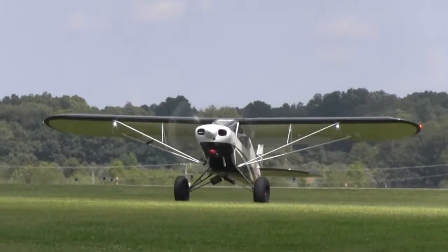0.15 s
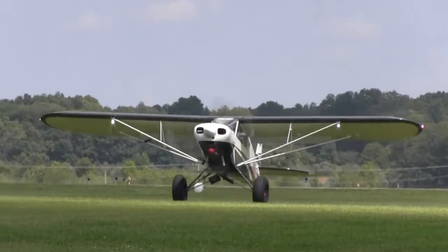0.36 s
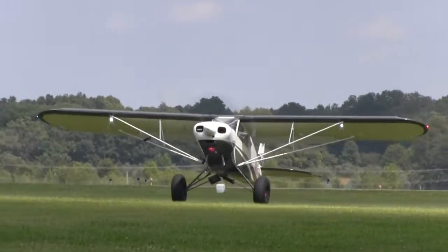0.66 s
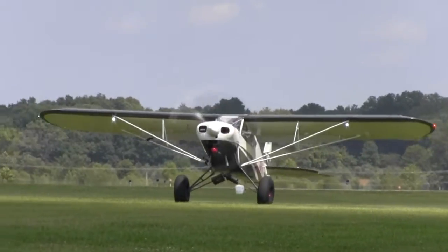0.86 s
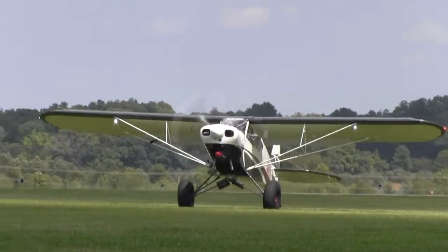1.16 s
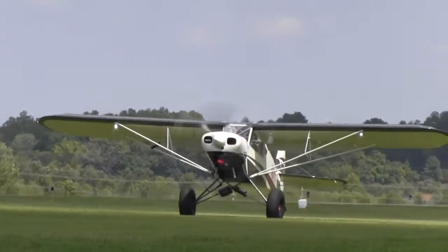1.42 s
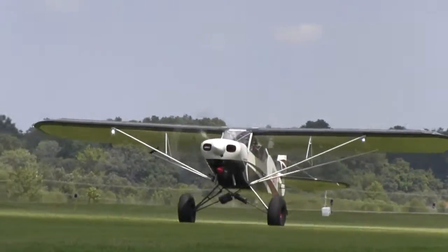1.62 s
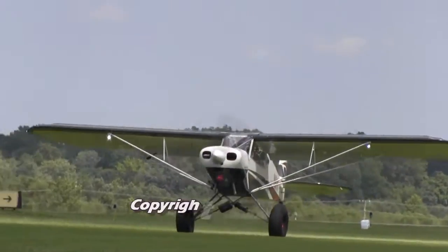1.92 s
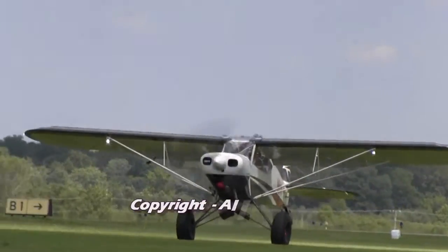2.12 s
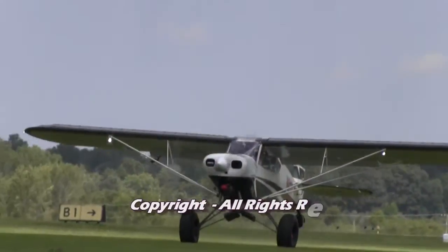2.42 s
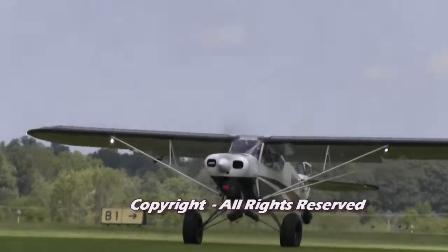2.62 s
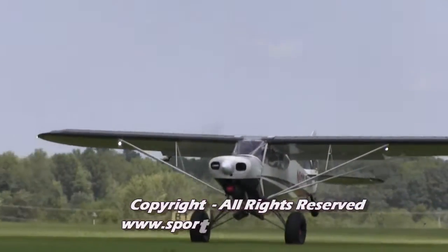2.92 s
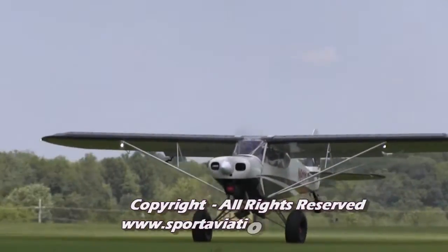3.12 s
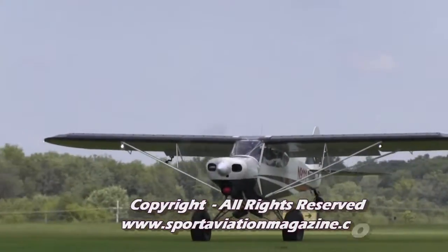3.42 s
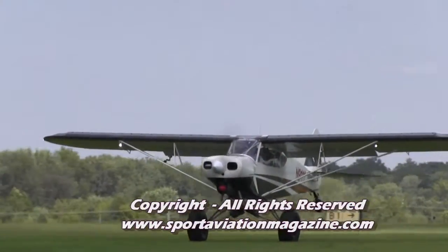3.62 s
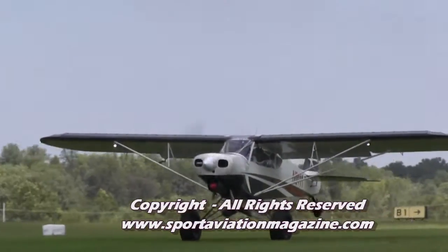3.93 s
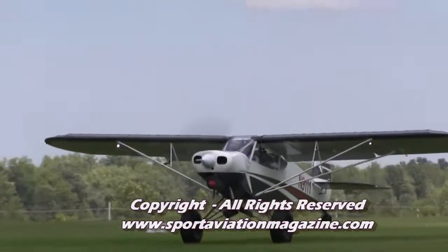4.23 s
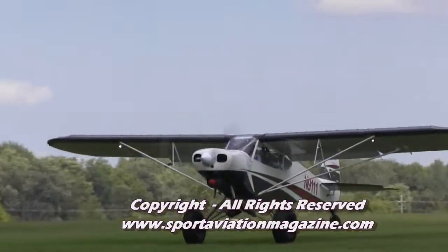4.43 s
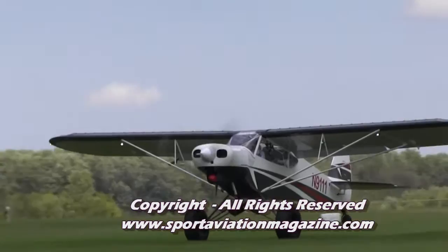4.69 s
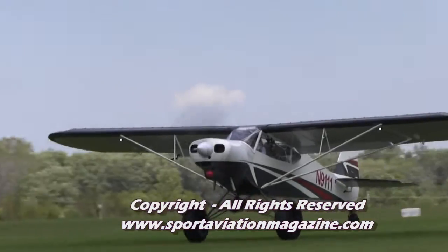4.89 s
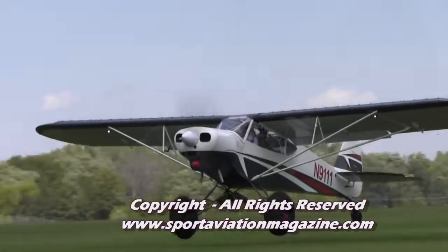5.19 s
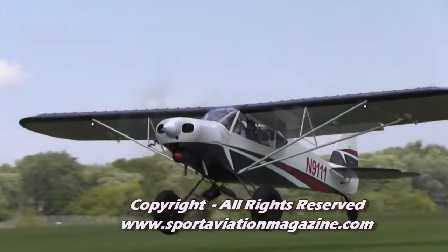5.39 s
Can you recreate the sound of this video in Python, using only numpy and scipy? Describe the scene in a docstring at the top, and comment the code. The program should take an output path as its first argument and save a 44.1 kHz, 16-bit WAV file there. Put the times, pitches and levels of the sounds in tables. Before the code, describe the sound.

A light aircraft on its takeoff run comes toward a stereo microphone at a grassy airfield. A steady, lumpy piston drone and soft air rush open the scene, with thin rasping insect chirps during the first second and a half. The fluttering roar then builds, brightening with propeller hiss and a subtle hollow, sweeping coloration, reaching its strongest around five seconds and remaining loud to the end.

```python
"""Over a grass field, a light aircraft runs at full power toward the microphone.
The exhaust note is a harmonic series of unequal cylinder blasts filtered by a resonant pipe.
The roar joins repeating barks, pulsed jet noise and the propeller's hiss, combed by airframe echoes.
Low propeller wash is shaped noise; an insect in the grass chirps by gating one narrow resonance."""
import sys
import numpy as np
from scipy import signal
from scipy.fft import rfft, irfft
from scipy.io import wavfile
from scipy.ndimage import uniform_filter1d

SR = 44100
rng = np.random.default_rng(int(sys.argv[2]) if len(sys.argv) > 2 else 0)


def wrap_up_sound(samples):
    """Save the sound to the file named by the first command line argument, as 16-bit audio."""
    columns = np.atleast_2d(samples).T
    # keep every value between -1 and 1, then stretch to whole-number steps
    tamed = np.clip(columns, -1, 1)
    steps = np.round(tamed * 32767).astype(np.int16)
    wavfile.write(sys.argv[1], SR, steps)


N = 244755
FRAME = 1024  # samples in a short-time spectrum
TIME, BIN_HZ = np.arange(N) / SR, np.fft.rfftfreq(FRAME, 1 / SR)


def amp(db):
    """Decibel law: level to amplitude gain."""
    return 10 ** (np.asarray(db) / 20)


def unit(x):
    """Normalisation to an rms of 1."""
    return x / np.sqrt(np.mean(abs(x) ** 2) + 1e-20)


def curve(rows, t, axis=1):
    """Linear interpolation of one column of a time table."""
    rows = np.asarray(rows)
    return np.interp(t, rows[:, 0], rows[:, axis])


def spectrum(points, hz):
    """Interpolation of (frequency, value) points on a log-frequency axis."""
    f, value = np.transpose(points)
    return np.interp(np.log(hz + 1), np.log(f + 1), value)


def fades(x, knots):
    """Linear crossfade: triangular weights, one row a knot, that sum to 1."""
    return np.array([np.interp(x, knots, row) for row in np.eye(len(knots))])


def wander(corner_hz):
    """Low-passed Gaussian noise of rms 1."""
    lowpass = 1 + (np.fft.rfftfreq(N, 1 / SR) / corner_hz) ** 4
    return unit(irfft(rfft(rng.standard_normal(N)) / lowpass, N))


def frames(x):
    """Short-time Fourier analysis, bins by frames."""
    return signal.stft(x, nperseg=FRAME, noverlap=FRAME - FRAME // 4)[2]


def unframe(z):
    """Overlap-add resynthesis from short-time spectra."""
    return signal.istft(z, nperseg=FRAME, noverlap=FRAME - FRAME // 4)[1][..., :N]


# engine cycles as heard, two shaft turns each: starting rate, its rise, place in the first cycle (0-1)
CYCLE_HZ, RISE_HZ_PER_S, FIRST_TURN = 20.413, .2611, .2156


def cycle_hz(t):
    """Linear frequency glide: the heard engine rate climbs as the plane gathers speed."""
    return CYCLE_HZ + RISE_HZ_PER_S * t


# cylinders in firing order: place_cycles, boom_ahead_db, boom_side_db, rasp_db, hiss_db, jet_length_cycles
CYLINDERS = [(.005, 0.5, -1, 0.5, 2.5, 0.079), (0.239, 3.5, -9, 0.5, -0.5, 0.1),
             (0.521, -44, -15, 2, 6, 0.056), (.735, -4.5, -7, -2.5, -2.5, 0.092)]
# resonances of the exhaust pipe: pitch_hz, width_hz
PIPE = [(121, 83), (271, 164)]


def blast_lines(order, side_on, lag=0.025):
    """Fourier series of four unequal blasts through a resonant pipe, seen from one angle."""
    hz = order * cycle_hz(TIME).mean()
    lines = 0
    for place, ahead_db, side_db, *_ in CYLINDERS:
        blast = amp(ahead_db + side_on * (side_db - ahead_db))
        lines = lines + blast * np.exp(-2j * np.pi * order * (place + lag))
    for f, width in PIPE:
        lines = lines / (1 + 1j * f / width * (hz / f - f / hz))
    return lines


# exhaust orders, each beamed its own way: order_per_cycle, ahead_db, side_db, changeover_turn (0-1)
EXHAUST = [(4, -14.5, -19, .15), (5, -30.5, -34, .5), (6, -26, -26.5, .5), (7, -22, -24, .3),
           (8, -12, -9.7, .65), (9, -10, -11.8, .15), (10, -13.7, -10.5, .45), (11, -9.5, -8, .45),
           (12, -2.2, -11.3, .62), (13, -16.7, -8.3, .5), (14, -24, -17.5, .3), (15, -15, -22, .18),
           (16, -12.5, -7.2, .35), (17, -24, -17, .72), (18, -35, -24, .45), (20, -20.5, -42, .64),
           (24, -44, -23, .4), (28, -38, -20, .55), (29, -31, -19.5, .3), (30, -38, -22, .62),
           (31, -43, -20, .44), (32, -28.5, -16, .73), (33, -39, -15, .5), (35, -38, -22, .37),
           (36, -41, -23, .3), (37, -40, -22, .22), (39, -37, -23, .2), (41, -25, -21, .3),
           (42, -38, -24, .14), (43, -38, -24, .18), (44, -29, -23, .55)]
# turn of the plane from nose-on (0) to side-on (1): time_s, turn
SIDE_ON = [(0, 0), (1.3, .03), (2, .13), (3, .39), (4, .47), (4.85, .81), (5.2, .92), (5.55, 1)]
# loudness of the exhaust note on the way in: time_s, level_db
BOOM_LEVEL = [(0, -31.5), (.7, -29), (1.85, -28), (2.6, -26), (3.55, -24), (4.15, -20.7), (4.95, -17.8),
              (5.13, -20.5), (5.42, -18.5), (5.55, -26)]


def boom(turns, unsteady_db=1.26, scatter=0.63, upper_db=0.37, shimmer=0.16,
         beam_edge=0.086, abeam=0.89, count=4):
    """Directivity: harmonics of the exhaust change weight with angle; the upper ones are phase-scattered."""
    order, ahead_db, side_db, change = np.transpose(EXHAUST)
    side_on, angles = curve(SIDE_ON, TIME), np.linspace(0, 1, count)
    upper = 1 / (1 + (21 / order) ** 8)  # near 0 for low orders, near 1 for high ones
    phase = np.angle([blast_lines(order, angle) for angle in angles])
    phase += 2 * np.pi * scatter * upper * rng.uniform(-0.42, 0.85, len(order))
    lines = (amp(ahead_db + upper_db * upper) * np.exp(1j * phase)).T
    view = fades(side_on / abeam, angles)
    drifts = [wander(4.9) for _ in range(5)]
    note = 0
    for k in range(len(order)):
        beam_db = (side_db[k] - ahead_db[k]) / (1 + np.exp((change[k] - side_on) / beam_edge))
        sway = shimmer * (upper[k] + 0.61) * drifts[k % len(drifts)]
        tone = (lines[k] @ view * np.exp(2j * np.pi * order[k] * turns)).real
        note = note + amp(beam_db) * (1 + sway) * tone
    note /= np.sqrt(uniform_filter1d(note ** 2, size=8400))  # even out before the level curve
    return note * amp(curve(BOOM_LEVEL, TIME) + unsteady_db * wander(56))


def barks(turns, ring=0.12, jitter=0.0009, size=1024):
    """Periodic impulse response: each header pipe rings alike at every firing, slightly early or late."""
    place = np.arange(size) / size
    cycle = 0
    for firing, _, _, rasp_db, *_ in CYLINDERS:
        decay = np.exp(-((place - firing) % 1) / ring)
        cycle = cycle + amp(rasp_db) * decay * rng.standard_normal(size)
    lines = rfft(cycle)
    cycle = irfft(lines / np.sqrt(abs(lines) + 1e-9))  # many reflections even out the orders
    return np.interp(turns + jitter * wander(77), place, cycle, period=1) * amp(2.2 * wander(40))


# depth of the pulsing in the roar: time_s, depth (0-1)
PULSING = [(0, 0.46), (1.5, 0.48), (2.8, 0.72), (4, 0.7), (4.8, 0.3), (5.55, 0.52)]


def jets(turns, axis, opening=0.021):
    """Amplitude-modulated noise: valves let out fast-rising puffs over the propeller's steady rush."""
    power = 0
    for row in CYLINDERS:
        age = (turns - row[0]) % 1
        puff = (1 - np.exp(-age / opening)) ** 2 * np.exp(-age / row[5])
        power = power + amp(row[axis]) ** 2 * puff
    depth = np.clip(curve(PULSING, TIME), 0, 1)
    envelope = np.sqrt(1 - depth + depth * power / power.mean())
    return envelope * amp(0.7 * wander(59)) * rng.standard_normal((2, N))


# two airframe reflections: inverted one's nose-on delay, its shortening by side-on, upright one's lead
ECHO_MS, ECHO_SHORTENS_MS, UPRIGHT_LEAD_MS = 1.195, .153, .156
TWIN_MS = .053  # spacing of each echo and its twin


def airframe(t, inverted=0.11, upright_top=0.18, facing=0.6, spread=0.47, twin=0.4, scatter_hz=15000):
    """Comb filtering by echoes, each with a weaker opposite twin; it glides upward as the plane turns."""
    def delayed(ms):
        """Linear phase of a pure delay."""
        return np.exp(-2j * np.pi * BIN_HZ[:, None] * ms / 1000)
    kept = 1 / (1 + (BIN_HZ[:, None] / scatter_hz) ** 2)  # curved panels scatter the top
    side_on = curve(SIDE_ON, t)
    delay_ms = ECHO_MS - ECHO_SHORTENS_MS * side_on
    # strongest while its panel faces the microphone
    upright = upright_top * np.exp(-((side_on - facing) / spread) ** 2)
    echoes = upright * delayed(delay_ms - UPRIGHT_LEAD_MS) * (1 - twin * delayed(TWIN_MS))
    echoes -= inverted * delayed(delay_ms) * (1 - twin * delayed(-TWIN_MS))
    return abs(1 + kept * echoes)


# brief swells and dips of the roar around one pitch: centre_s, half_length_s, pitch_hz, half_width_octaves, gain_db
SWELLS = [(0.954, 0.75, 1320, 0.16, 4.5), (2.366, 0.18, 2760, 0.27, 6.5), (2.537, .08, 4050, 0.28, 5),
          (1.48, .1, 1300, .6, 2.5), (2.759, 0.3, 1730, 0.58, 5.5), (3.064, 0.14, 3420, 0.43, 8),
          (3.35, .35, 870, 0.39, 6), (3.35, .2, 1440, 0.22, -4.5), (3.874, 0.17, 1420, 0.25, -4.5),
          (4.25, 0.28, 940, 0.37, 6), (4.3, 0.73, 13400, 0.42, 2.5), (5.023, 0.092, 3120, 0.74, 5),
          (5.462, 0.055, 3140, 0.96, 6)]


def swells(t, hz):
    """Time-frequency weighting: each swell or dip is a Gaussian hump in time and log pitch, in dB."""
    total_db = 0
    for s, length, centre, octaves, db in SWELLS:
        pitch_distance = np.log2((hz + 1) / centre) / octaves
        total_db = total_db + db * np.exp(-((t - s) / length) ** 2 - pitch_distance ** 2)
    return total_db


# left-right likeness of the roar: pitch_hz, likeness (0-1)
SAME = [(100, 0.26), (640, 0.8), (1200, 0.8), (3100, .91), (7000, 0.86), (15000, 0.95)]
# colour of the roar: pitch_hz, ahead_db_per_hz, side_db_per_hz
COLOURS = [(520, -11.5, -4), (630, 1, -11.5), (720, -7.5, 4), (850, -0.5, -0.5), (1070, -4.5, -4),
           (1400, -4, 0.5), (2100, -5, -1.5), (2780, -4, -2.5), (4400, -5.5, -5.5), (5500, -8.5, -5.5),
           (6540, -11, -8), (8880, -15.5, -12), (11200, -22, -18), (12850, -23, -15), (15500, -37, -29)]
# fixed resonances and notches: pitch_hz, width_hz, gain_db
RINGS = [(475, 24, -17), (566, 21, -1.5), (1665, 69, 5), (1848, 160, -4), (2160, 52, 0.5), (2450, 67, -5.5),
         (3856, 67, 4), (8900, 170, 3)]
# loudness of the roar on the way in: time_s, level_db
ROAR_LEVEL = [(0, -38.5), (.4, -36), (1.85, -34), (3, -27), (3.4, -28.5), (4.15, -25), (4.95, -15.3),
              (5.15, -16), (5.36, -15.3), (5.55, -17.5)]
# stereo balance of the roar: time_s, left_minus_right_db
PAN = [(0, 0.5), (3, 0.6), (4.5, 0.2), (5.55, -0.3)]
ROAR_FROM_HZ = 550  # the roar's level is reckoned above this pitch


def roar(turns, steady_hz=1650, steady_share=0.28, smooth_share=0.21, hiss_hz=2700,
         patchy_db=2.0, valley_db=-4):
    """Power-sharing mix: repeating barks below, turbulent jets above, shimmering in the moving air."""
    hz = BIN_HZ[:, None]
    bark = frames(barks(turns))
    rasp, hiss = unit(frames(jets(turns, axis=3))), unit(frames(jets(turns, axis=4)))
    bark_band = (BIN_HZ > ROAR_FROM_HZ) & (BIN_HZ < hiss_hz)
    bark /= np.sqrt(np.mean(abs(bark[bark_band]) ** 2))
    t = np.linspace(0, N / SR, bark.shape[1])
    high, low = 1 / (1 + (hiss_hz / (hz + 1)) ** 4), 1 / (1 + (hz / 930) ** 12)
    steady = np.clip(steady_share * (1 - 0.21 * low) / (1 + (hz / steady_hz) ** 6), 0, 1)
    main, other = np.sqrt(1 - high) * rasp + np.sqrt(high) * hiss
    # the propeller's smooth hiss takes over a share of the top
    smooth = np.clip(smooth_share / (1 + (6000 / (hz + 1)) ** 4), 0, 1)
    propeller = unit(frames(rng.standard_normal(N) * amp(1.3 * wander(90))))
    main = np.sqrt(1 - smooth) * main + np.sqrt(smooth) * propeller
    main = np.sqrt(steady) * bark + np.sqrt(1 - steady) * main
    same = np.clip(spectrum(SAME, hz), 0, 1)
    shared, apart = np.sqrt(1 + same) * main, np.sqrt(1 - same) * other
    z = np.array([shared + apart, shared - apart])
    ahead_db, side_db = (spectrum(np.array(COLOURS)[:, [0, k + 1]], hz) for k in range(2))
    colour_db = ahead_db + curve(SIDE_ON, t) * (side_db - ahead_db)
    colour_db += sum(db * np.exp(-((hz - f) / width) ** 2) for f, width, db in RINGS)
    patches = uniform_filter1d(rng.standard_normal(bark.shape), size=7, axis=0)
    patches = unit(uniform_filter1d(patches, size=20, axis=1))
    highpass = np.sqrt(1 + (440 / (hz + 1)) ** 12)
    z *= amp(colour_db + patchy_db * patches) * airframe(t) / highpass
    # the whole roar grows as the plane nears; 4/3 makes up for the analysis window
    power = (abs(z.mean(0)[BIN_HZ > ROAR_FROM_HZ]) ** 2).sum(0) * 4 / 3
    near_db = curve(ROAR_LEVEL, t) - 10 * np.log10(uniform_filter1d(power, size=32))
    # where the exhaust orders stand out, the roar only fills the valleys between them
    z *= amp(near_db + swells(t, hz) + valley_db * low)
    return unframe(z) * amp(np.outer([.5, -.5], curve(PAN, TIME)))


# colour of the low air rush under the exhaust: pitch_hz, level_db_per_hz
RUSH = [(15, -27), (40, -11), (70, -13), (120, -8), (200, 3.5), (300, 0.5), (400, -8), (500, -11),
        (800, -34)]
RUSH_APART = .45  # stereo width: share of the side signal


def rush(level_db=-38, growth=0.52):
    """Shaped turbulence of the propeller wash; its level in dB follows a share of the exhaust's rise."""
    colour = amp(spectrum(RUSH, np.fft.rfftfreq(N, 1 / SR)))
    mid, side = unit(irfft(rfft(rng.standard_normal((2, N))) * colour, N))
    near_db = curve(BOOM_LEVEL, TIME)
    gain = amp(level_db + growth * (near_db - near_db.max()))
    return np.array([mid + RUSH_APART * side, mid - RUSH_APART * side]) * gain


# insect chirps: centre_s, level_db
CHIRPS = [(.23, -58), (.42, -51), (.65, -48), (.88, -50), (1.07, -49), (1.25, -50), (1.45, -48)]


def insect(pitch_hz=9200, width_hz=150, length_s=.027):
    """Narrow-band resonance: a noise-modulated wing tone gated into short rasping chirps."""
    chirps = sum(amp(db) * np.exp(-((TIME - s) / length_s) ** 2) for s, db in CHIRPS)
    return chirps * unit(wander(width_hz) * np.sin(2 * np.pi * pitch_hz * TIME))


def scene():
    """Superposition: one crankshaft phase drives the boom and roar; wash and insect are added."""
    turns = FIRST_TURN + np.cumsum(cycle_hz(TIME)) / SR
    return boom(turns) + roar(turns) + rush() + insect()


# the two microphone ports: pitch_hz, left_minus_right_db, left_lead_rad
PORTS = [(85, -1.1, 0.0), (170, 0.3, 0.3), (250, 2.1, 0.07), (345, 1.1, 0.29), (620, -0.1, 0.08),
         (900, -2.2, -0.09), (1300, 0.4, -0.34), (2100, 0.0, -0.13), (4000, -0.7, -0.11),
         (9000, -0.3, -0.08)]
EDGE_HZ = 15850  # band limit


def record(dry):
    """Interchannel level and phase differences of two ports, then soft saturation and a low-pass."""
    ports = np.array(PORTS)
    lean_db, lead = (spectrum(ports[:, [0, k + 1]], BIN_HZ) for k in range(2))
    tint = amp(np.outer([.5, -.5], lean_db)) * np.exp(1j * np.outer([.5, -.5], lead))
    tinted = unframe(frames(dry) * tint[:, :, None])
    tinted /= (1 + (tinted / .92) ** 8) ** (1 / 8)  # rounds the tallest peaks
    lowpass = signal.firwin(511, EDGE_HZ, window=("kaiser", 9), fs=SR)
    return signal.oaconvolve(tinted, lowpass[None], "same")


dry = scene()
out = record(dry)
wrap_up_sound(out)
```